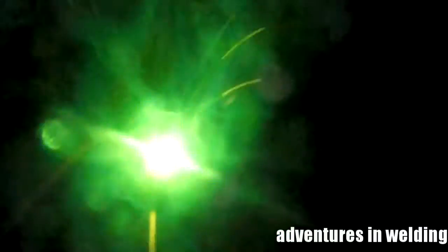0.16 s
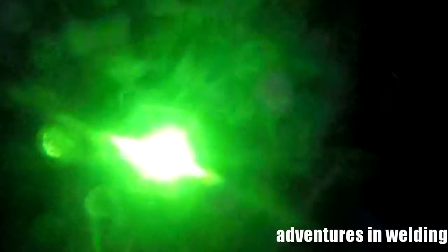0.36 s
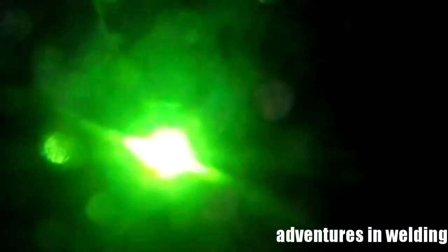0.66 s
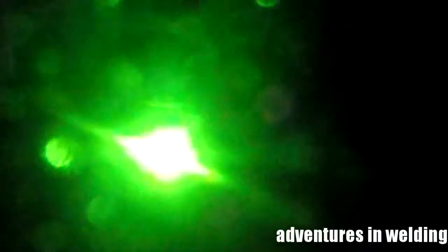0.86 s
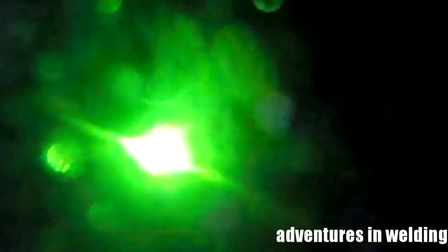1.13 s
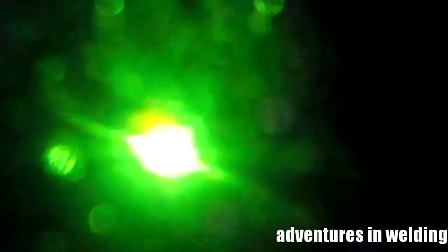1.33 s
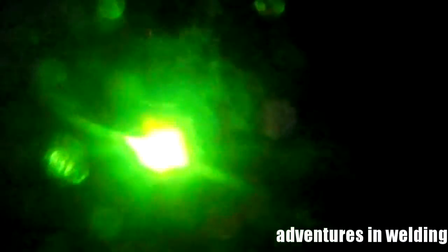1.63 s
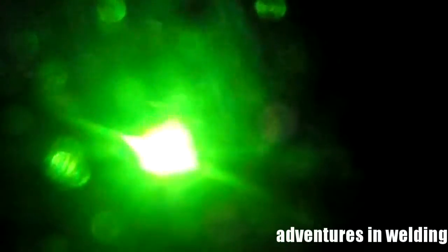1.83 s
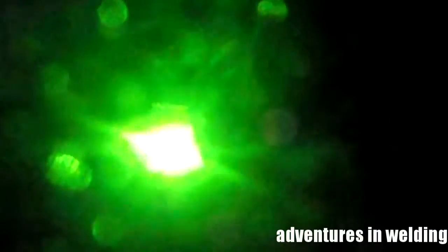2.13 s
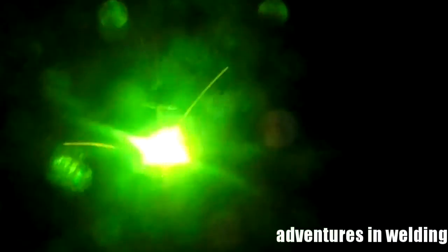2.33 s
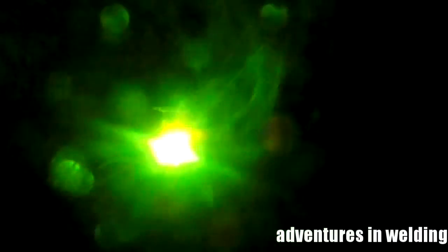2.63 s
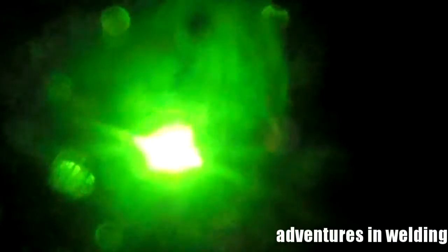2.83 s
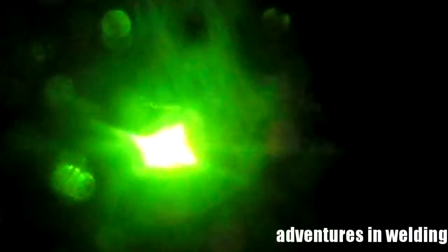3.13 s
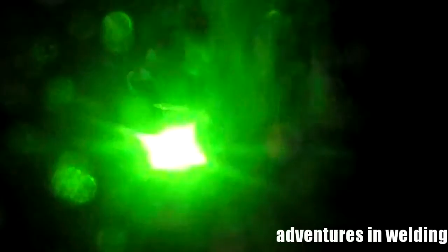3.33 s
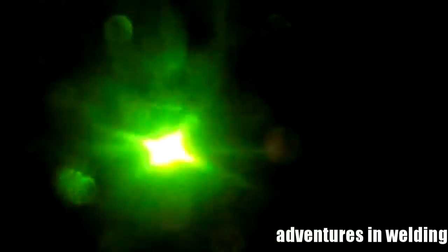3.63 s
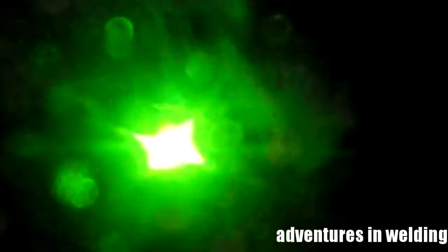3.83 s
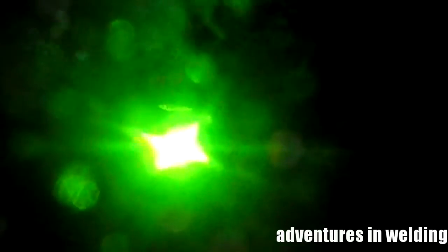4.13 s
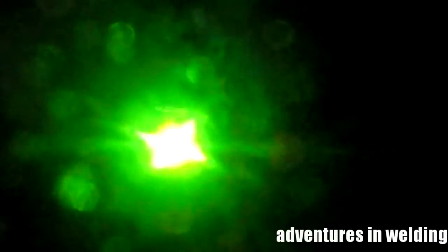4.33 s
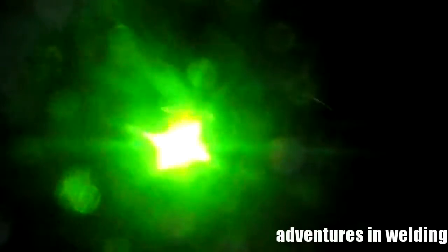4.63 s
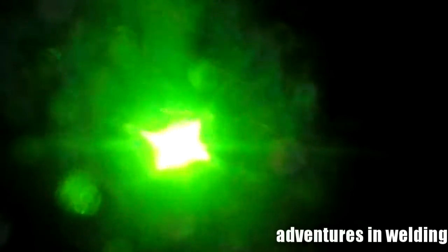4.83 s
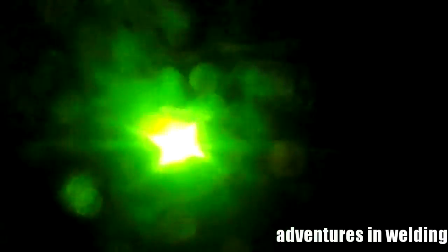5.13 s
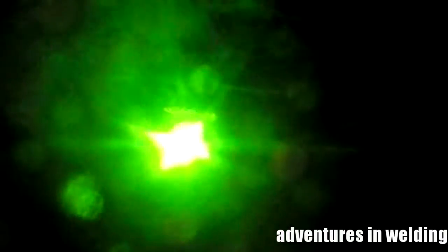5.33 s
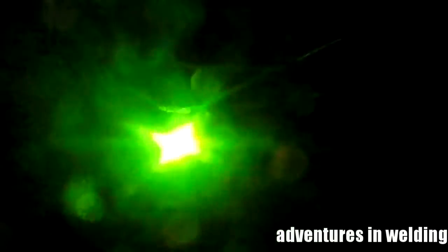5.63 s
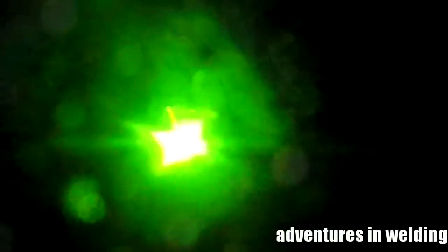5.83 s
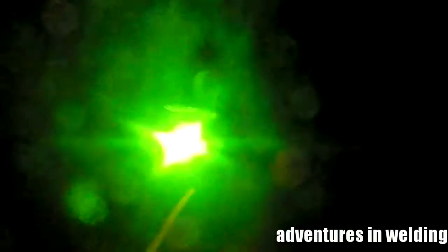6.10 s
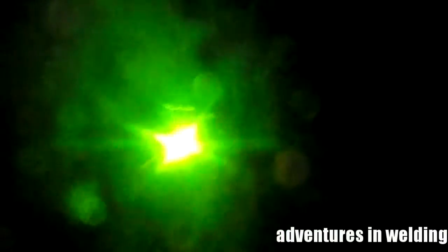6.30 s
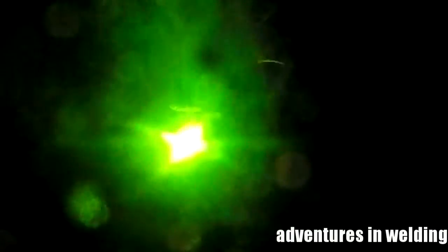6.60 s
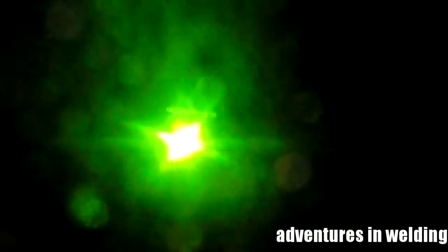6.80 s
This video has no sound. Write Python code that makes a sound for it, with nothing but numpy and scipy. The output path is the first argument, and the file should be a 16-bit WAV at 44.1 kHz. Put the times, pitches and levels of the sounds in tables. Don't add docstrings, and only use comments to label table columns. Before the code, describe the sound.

Rapid hard electrical cracks and tiny pops with sputtering hiss as a torch welds thick steel plate, the shop answering each snap briefly.

```python
import sys
import numpy as np
from scipy import signal
from scipy.fft import rfft, irfft, next_fast_len
from scipy.io import wavfile
from scipy.ndimage import uniform_filter1d

SR = 44100
rng = np.random.default_rng(int(sys.argv[2]) if len(sys.argv) > 2 else 0)


def convert_level_to_amplitude(level_db):
    exponent = np.asarray(level_db, float) / 20
    return 10 ** exponent


def digitize_waveform(pressure):
    field = np.atleast_2d(pressure).T
    bounded = np.clip(field, -1, 1)
    quanta = np.round(bounded * 32767).astype(np.int16)
    wavfile.write(sys.argv[1], SR, quanta)


N = 306936

SNAP_DB_PER_SHARE = 5.5


def evened(x):
    return x / np.sqrt(np.mean(x ** 2) + 1e-20)


def read(points, hz):
    f, value = np.transpose(points)
    return np.interp(np.log(hz + 1), np.log(f + 1), value)


def coloured(x, points):
    size = next_fast_len(len(x) + 4096)
    gain = convert_level_to_amplitude(read(points, np.fft.rfftfreq(size, 1 / SR)))
    return irfft(rfft(x, size) * gain, size)[:len(x)]


def impulses(s, size):
    at = s.ravel()[:, None] * SR
    near = np.floor(at) + np.arange(-7, 9)
    kernel = np.sinc(near - at) * np.cos(np.pi * (near - at) / 16) ** 2
    heights = size.ravel()[:, None] * kernel
    return np.bincount(near.astype(int).ravel(), heights.ravel(), N + SR)[:N]


def patchy(x):
    patch_db = 2
    z = signal.stft(x, nperseg=512)[2]
    field = uniform_filter1d(rng.standard_normal(z.shape), size=6, axis=0)
    field = evened(uniform_filter1d(field, size=8, axis=1))
    return evened(signal.istft(z * convert_level_to_amplitude(patch_db * field), nperseg=512)[1][:N])


def hum():
    # pitch_hz, level_db (per Hz)
    wash_spectrum = [(30, -19), (70, -10), (150, -14), (255, 1), (330, -5), (420, -10), (650, -7),
                     (900, -14), (1900, -11), (2600, -20), (4500, -16), (7000, -24), (10000, -34),
                     (15000, -43), (15400, -75)]
    # time_s, lift_db
    wash_lift = [
        (0, 2),
        (1, 0),
        (3.1, 0),
        (4.45, -1.5),
        (5.05, 0.5),
        (5.7, 3),
        (6.96, 1.5),
    ]
    wash_db, whine_hz, whine_db = -49.5, 520, -56.5
    t = np.arange(N) / SR
    slow = uniform_filter1d(rng.standard_normal((2, N)), 2500)
    waver, wobble = evened(uniform_filter1d(slow, 2500))
    wash = convert_level_to_amplitude(wash_db + 1.95 * waver) * patchy(coloured(rng.standard_normal(N), wash_spectrum))
    turn = 2 * np.pi * np.cumsum(whine_hz + 1.75 * waver) / SR
    whine = convert_level_to_amplitude(whine_db + 1.5 * wobble) * (np.sin(turn) + .3 * np.sin(2 * turn))
    return convert_level_to_amplitude(np.interp(t, *np.transpose(wash_lift))) * (wash + whine)


def arc_cycle():
    # strike_s, crack_db, rebound_share (above 0 the gas snaps back)
    full_strikes = [(0.0452, -6.4, 0.42), (0.0456, -9.8, 0.06), (0.0459, -3.5, -0.33),
                    (0.0614, -8.2, -0.12), (0.0695, -13.0, -0.29), (0.0768, -3.3, -0.0),
                    (0.0912, -8.2, 0.09), (0.0986, -6.6, -0.11), (0.1095, -11.8, -0.28),
                    (0.1143, -5.1, -0.16), (0.1207, -11.2, -0.11), (0.1313, -2.9, -0.17),
                    (0.2087, -0.4, -0.15), (0.2908, -2.4, -0.14), (0.3468, -0.2, 0.12),
                    (0.4905, -0.5, -0.11), (0.538, -0.6, 0.27), (0.5992, -3.1, -0.21),
                    (0.6545, -1.0, -0.18), (0.7212, -1.7, -0.16), (0.8294, -0.7, -0.09),
                    (0.906, -1.3, -0.1), (1.1393, -0.8, 0.1), (1.1683, -8.9, -0.02), (1.179, -2.3, 0.19),
                    (1.2247, -6.9, 0.09), (1.23, -2.0, 0.16), (1.2318, -9.6, -0.36), (1.2836, -0.9, -0.01),
                    (1.3552, -0.9, -0.14), (1.4057, -1.7, -0.04), (1.4181, -4.6, -0.13),
                    (1.4617, -4.6, 0.14), (1.4708, -6.6, -0.1), (1.5246, -1.4, -0.17),
                    (1.5789, -0.8, 0.18), (1.6334, -0.8, -0.12), (1.7454, -1.8, -0.21),
                    (1.8029, -1.2, -0.01), (1.8601, -0.5, 0.01), (1.9062, -0.7, -0.12),
                    (1.9556, -3.7, -0.38), (1.9946, -3.9, 0.18), (2.0511, -2.3, 0.16),
                    (2.1458, -4.4, -0.34), (2.1847, -1.8, 0.16), (2.2346, -1.1, 0.17), (2.3037, -0.9, 0.3),
                    (2.4964, -1.8, -0.13), (2.5346, -7.5, -0.02), (2.5413, -1.5, 0.2),
                    (2.5793, -8.7, -0.01), (2.5829, -8.1, 0.05), (2.6413, -1.9, -0.18),
                    (2.6752, -13.2, -0.27), (2.6758, -13.4, -0.48),
                    (2.6895, -2.2, -0.32), (2.7322, -4.1, 0.05), (2.7643, -2.8, 0.18), (2.8215, -0.7, 0.01),
                    (2.8802, -0.2, 0.23), (2.9417, -2.8, 0.27), (3.2054, -0.9, 0.07), (3.2489, -1.7, 0.04),
                    (3.2982, -0.5, 0.19), (3.3637, -0.2, 0.01), (3.4119, -1.4, -0.01),
                    (3.5834, -1.9, -0.24), (3.6355, -4.2, 0.19), (3.6399, -3.3, 0.16), (3.6446, -6.6, 0.17),
                    (3.8387, -2.1, -0.2), (3.879, -1.8, 0.15), (3.9763, -2.4, -0.25), (4.0175, -0.8, 0.03),
                    (4.0714, -0.8, 0.21), (4.116, -0.5, 0.27), (4.1569, -5.8, 0.12), (4.2451, -0.9, -0.05),
                    (4.2953, -0.6, -0.09), (4.3472, -0.8, 0.01), (4.5353, -1.4, -0.18),
                    (4.5926, -0.9, 0.25), (4.6485, -0.9, -0.16), (4.7801, -0.6, -0.02),
                    (4.8285, -1.0, -0.05), (4.9363, -1.5, -0.01), (5.1309, -1.3, -0.12),
                    (5.1641, -2.3, 0.15), (5.224, -0.9, 0.02), (5.301, -0.7, -0.13), (5.7728, 0.7, 0.13),
                    (5.8221, -5.8, 0.05), (6.0129, -5.8, 0.1), (6.0142, -2.9, -0.15), (6.0668, -8.1, -0.12),
                    (6.0682, -9.4, -0.3), (6.1289, 0.3, 0.33), (6.193, -7.6, -0.03), (6.2703, -0.7, -0.13),
                    (6.3144, -6.8, -0.34), (6.4328, -9.3, -0.19), (6.4604, -6.8, -0.03),
                    (6.5174, -5.8, 0.04), (6.5213, -4.2, 0.05), (6.5356, -9.5, 0.07), (6.6104, -1.8, -0.04),
                    (6.7141, -1.0, 0.08), (6.7446, -10.9, 0.12), (6.7473, -3.8, 0.09), (6.8073, -0.7, 0.05),
                    (6.8721, -8.5, -0.31)]
    # strike_s, crack_db
    brief_touches = [(0.0688, -13), (0.1076, -11), (0.4062, -12), (0.4075, -14), (0.4163, -14),
                     (0.4166, -15), (0.4345, -17), (0.5755, -11), (0.5953, -20), (0.6484, -15),
                     (0.8019, -14), (0.8023, -15), (0.901, -12), (1.2251, -18), (1.2263, -15),
                     (1.4511, -12), (1.5055, -22), (1.8549, -16), (1.8634, -16), (1.9425, -16),
                     (2.0481, -10), (2.2295, -12), (2.2991, -11), (2.5311, -10), (2.6348, -15),
                     (2.6395, -14), (2.6633, -13), (2.6683, -14), (2.7182, -18), (2.7185, -19),
                     (2.7192, -20), (2.7301, -21), (2.9207, -18),
                     (2.9329, -12), (2.9367, -11), (3.2413, -13), (3.4547, -11), (3.4595, -15), (3.46, -14),
                    (3.6195, -12), (3.6209, -12), (3.6211, -16), (3.6321, -16), (3.661, -15), (3.8422, -16),
                    (3.8714, -16), (3.9196, -15), (3.9249, -15), (3.9285, -13), (3.9752, -12),
                    (4.1537, -10), (4.4204, -32), (4.5282, -17), (4.6403, -12), (4.6425, -14),
                    (4.7142, -15), (4.7211, -14), (4.7231, -13), (4.7296, -16), (5.203, -11), (5.2172, -17),
                    (5.3746, -23), (5.377, -17), (5.4633, -29), (5.4958, -30), (5.5387, -31), (5.5932, -18),
                    (5.818, -16), (6.1011, -31), (6.3136, -13), (6.3625, -18), (6.3682, -12), (6.4196, -19),
                    (6.4483, -15), (6.6069, -15), (6.6635, -13), (6.6648, -16), (6.665, -13), (6.7104, -18)]
    # touch_s, pop_db
    short_pops = [(0.0426, -12), (0.0454, -8), (0.0611, -9), (0.0681, -11), (0.0694, -10), (0.0753, -8),
                  (0.0899, -10), (0.0964, -7), (0.1066, -8), (0.114, -11), (0.1149, -13), (0.1205, -13),
                  (0.1304, -9), (0.1319, -12), (0.2063, -13), (0.2871, -14), (0.3443, -13), (0.4049, -14),
                  (0.4071, -13), (0.4152, -14), (0.4161, -15), (0.46, -30), (0.4877, -15), (0.5345, -15),
                  (0.5732, -14), (0.5763, -10), (0.5979, -16), (0.6476, -14), (0.6514, -15), (0.7179, -13),
                  (0.8015, -18), (0.8017, -19), (0.8024, -8), (0.8279, -14), (0.8993, -13), (0.902, -12),
                  (0.9443, -15), (1.136, -14), (1.1675, -12), (1.1755, -11), (1.2202, -22), (1.2217, -14),
                  (1.2288, -13), (1.2819, -15), (1.3521, -13), (1.4026, -15), (1.4175, -12), (1.4493, -16),
                  (1.4524, -19), (1.4599, -12),
                  (1.4705, -13), (1.5042, -14), (1.5221, -14), (1.5757, -14), (1.6309, -13), (1.7425, -13),
                (1.8003, -13), (1.8543, -12), (1.8579, -13), (1.9035, -13), (1.942, -14), (1.9534, -13),
                (1.9911, -14), (2.0457, -13), (2.0491, -9), (2.1431, -13), (2.1817, -12), (2.2285, -12),
                (2.231, -13), (2.2975, -13), (2.302, -11), (2.3055, -5), (2.3107, -16), (2.4928, -13),
                (2.5299, -13), (2.5323, -10), (2.5408, -11), (2.5774, -12), (2.5807, -10), (2.6285, -29),
                (2.6347, -13), (2.6386, -14), (2.6407, -8), (2.6678, -12), (2.6751, -10), (2.6889, -9),
                (2.718, -17), (2.7197, -21), (2.7309, -13), (2.761, -12), (2.8183, -14), (2.8772, -15),
                (2.9206, -16), (2.9284, -15), (2.9311, -16), (2.9347, -14), (2.9411, -15), (3.1905, -13),
                (3.2025, -12),
                  (3.2395, -14), (3.2418, -21), (3.2465, -12), (3.2943, -12), (3.3614, -13), (3.4087, -13),
                (3.4534, -14), (3.4553, -11), (3.5808, -14), (3.6182, -13), (3.6201, -10), (3.6331, -16),
                (3.6394, -14), (3.6482, -16), (3.8345, -11), (3.8664, -18), (3.8758, -11), (3.919, -12),
                (3.924, -10), (3.9275, -9), (3.9732, -13), (3.9756, -10), (4.014, -13), (4.0657, -23),
                (4.0686, -14), (4.1127, -13), (4.1516, -14), (4.1543, -9), (4.2425, -15), (4.2925, -13),
                (4.3443, -15), (4.5274, -13), (4.5317, -12), (4.5897, -14), (4.6393, -13), (4.6419, -13),
                (4.6464, -12), (4.7134, -13), (4.7149, -12), (4.7153, -16), (4.7205, -13), (4.7773, -12),
                (4.8258, -13), (4.8724, -13), (4.873, -12), (4.8742, -15), (4.8878, -21), (4.888, -13),
                (4.891, -15), (4.9347, -13),
                  (5.1288, -13), (5.1613, -12), (5.2018, -12), (5.2204, -17), (5.299, -14), (5.371, -12),
                (5.3766, -13), (5.4341, -12), (5.5853, -10), (5.6204, -10), (5.77, -9), (5.8176, -12),
                (5.82, -11), (5.889, -29), (6.0113, -12), (6.0133, -8), (6.0146, -14), (6.0657, -10),
                (6.0676, -7), (6.1253, -13), (6.1857, -14), (6.1928, -14), (6.2683, -14), (6.3122, -15),
                (6.3143, -11), (6.3635, -21), (6.3668, -15), (6.4325, -13), (6.4528, -11), (6.4533, -9),
                (6.502, -13), (6.5168, -11), (6.521, -11), (6.5354, -11), (6.6065, -11), (6.6089, -9),
                (6.6626, -11), (6.6644, -9), (6.7123, -12), (6.7434, -11), (6.744, -10), (6.8049, -13),
                (6.8719, -14)]
    pop_trim_db = -2.1
    weak = brief_touches
    rebound = 0.0028 + 0.15 * rng.standard_normal(len(weak))
    strikes = [tuple(row) for row in full_strikes]
    strikes = strikes + [(s, db, share) for (s, db), share in zip(weak, rebound)]
    shorts = [(s, db + pop_trim_db) for s, db in short_pops]
    return strikes, shorts


def sizzle(strikes, shorts):
    # touch_s, rise_db_per_ms, final_db
    swells = [(.0426, 1, -37), (.8015, .8, -40), (1.136, 1.8, -39), (1.7425, .35, -34), (2.1431, .7, -34),
              (2.4928, 1.5, -33), (3.5808, 1, -36), (3.8345, .6, -33), (4.2425, 1.5, -37),
              (4.5274, 1.5, -37), (4.7773, .9, -37), (5.1288, 1.2, -33), (5.463, .3, -46), (5.499, .3, -45),
              (5.54, .3, -47), (5.77, .9, -37), (5.889, .4, -45), (6.0113, .4, -39), (6.1253, .4, -44),
              (6.2683, 1.5, -41), (6.4196, .9, -36), (6.6065, .9, -41)]
    # pitch_hz, width_hz, level_db
    hiss_resonances = [(4900, 700, 0), (6600, 600, 1), (8100, 700, 0)]
    flare_db, flare_t60_s = -34, 0.25
    approach_db, approach_t60_s = -54, 0.13
    sputter_db = 4.5
    t = np.arange(N) / SR
    s, db, rebound = np.transpose(strikes)
    kick_db = db + flare_db + SNAP_DB_PER_SHARE * rebound + 2 * rng.standard_normal(len(s))
    kicks = np.bincount((s * SR).astype(int), convert_level_to_amplitude(kick_db) ** 2, N)
    flare = signal.lfilter([1], [1, -convert_level_to_amplitude(-2 * 60 / (flare_t60_s * SR))], kicks)

    touches = np.bincount((np.transpose(shorts)[0] * SR).astype(int), minlength=N) * convert_level_to_amplitude(2 * approach_db)
    approach = signal.lfilter([1], [1, -convert_level_to_amplitude(-2 * 60 / (approach_t60_s * SR))], touches[::-1])[::-1]
    swell = sum(convert_level_to_amplitude(2 * (end_db - 1000 * rise * abs(t - touch))) * (t < touch + .003)
                for touch, rise, end_db in swells)
    power = abs(uniform_filter1d(flare + approach, 200)) + swell
    sputter = np.tanh(evened(uniform_filter1d(rng.standard_normal(N), size=120)))
    power = power * convert_level_to_amplitude(2 * sputter_db * sputter - sputter_db)

    band = signal.butter(2, (2600, 8300), "bandpass", fs=SR, output="sos")
    hiss = signal.sosfilt(band, coloured(rng.standard_normal(N), [(15000, 0), (15400, -40)]))
    hiss = hiss + sum(convert_level_to_amplitude(peak_db) * signal.lfilter(*signal.iirpeak(hz, hz / width, SR), hiss)
                      for hz, width, peak_db in hiss_resonances)
    return np.sqrt(power) * evened(hiss)


def pressure_steps(strikes, shorts, echoes):
    # tick_s, level_db
    ticks = [(1.5074, -22), (1.7411, -28), (2.4897, -27), (4.3838, -32), (4.5295, -16), (4.9139, -25),
             (5.0879, -33), (5.417, -31), (5.503, -37), (5.95, -40), (6.6725, -19)]
    short_rebound, rebound_ms = .24, .075
    echo_db = -0.66
    root_wander, root_wander_ms = .27, .012
    pushes = [(s, db, short_rebound) for s, db in shorts + ticks]
    s, db, rebound = np.transpose(strikes + pushes)[..., None]
    size = convert_level_to_amplitude(db) * np.where(np.arange(len(s)) < len(strikes), -1, 1)[:, None]

    ms, gain, drift = np.transpose(echoes)
    late_wander, size_wander = rng.standard_normal((2, len(s), len(ms))) * (ms > .1)
    s = s + (ms + drift * s + root_wander_ms * late_wander) / 1000
    size = size * gain * (1 + root_wander * size_wander) * convert_level_to_amplitude(echo_db * (ms > 0))

    fade = np.exp(-1000 / (rebound_ms * SR))
    back = signal.lfilter([0, 0, 0, .62], [1, -fade], impulses(s, size * rebound))
    sharp = np.clip(.22 * rng.standard_normal((len(s), 1)), -.3, .5)
    edge = np.convolve(impulses(s, size * sharp), [-1, 2, -1], "same")
    return impulses(s, size * (1 - .5 * sharp)) + edge - back


def cracks(arc):
    # delay_ms, signed_gain, drift_ms_per_s
    close_echoes = [(-.06, .13, 0), (.075, -.11, 0), (.22, -.08, 0), (.35, -.43, 0), (.58, .07, 0),
                    (.71, -.27, 0), (.84, -.2, .004), (.95, -.26, -.003), (1.11, -.2, 0),
                    (1.25, -.16, -.005), (1.33, .15, -.007), (1.41, -.12, -.008), (1.61, .28, -.008),
                    (1.75, -.23, -.011), (1.84, .17, -.009), (2.06, .2, -.007), (2.35, -.17, -.008),
                    (3.27, .12, .002), (3.37, -.05, 0)]
    # delay_ms, signed_gain, drift_ms_per_s
    far_returns = [(3.5, .06, 0), (4.95, .06, 0), (5.72, .11, -.004), (6.5, .08, .004), (8.3, .09, 0),
                   (8.7, .1, -.004), (10.4, -.09, -.004), (12.7, -.07, 0), (13.9, .08, 0), (14.6, .08, 0)]
    # pitch_hz, level_db
    return_cut = [(300, -18), (900, -4.5), (1800, -5.5)]
    # pitch_hz, level_db
    crack_spectrum = [(30, -9), (150, -.5), (700, -.7), (1300, -.3), (2000, -1.8), (4000, -5), (6000, -9),
                      (8000, -14.3), (11000, -26), (15000, -37), (16500, -52)]
    crack_db = .2
    direct = (0.0008, 0.98, 0.0013)
    steps = pressure_steps(*arc, [direct] + close_echoes)
    steps = steps + coloured(pressure_steps(*arc, far_returns), return_cut)
    one = signal.unit_impulse(512, "mid")
    return convert_level_to_amplitude(crack_db) * coloured(steps, crack_spectrum) / coloured(one, crack_spectrum).max()


def plate_ring(t):
    # pitch_hz, level_db, t60_s
    modes = [(183, -2.5, 0.13), (333, 0.0, 0.12), (377, -1.8, 0.12), (492, -2, 0.12), (585, 1.0, 0.12),
             (1381, -3.7, 0.12), (1604, -3.7, 0.12), (1863, -5, 0.12), (1911, -1.7, 0.12), (1957, -1, 0.12),
             (2059, -5.1, 0.12), (3206, -7, 0.12), (3596, -4.7, 0.12), (3669, -5.6, 0.12),
             (4452, -4.0, 0.12), (4643, -6.3, 0.12), (4931, -6.3, 0.12), (5025, -7, 0.12),
             (5141, -5.8, 0.12), (5351, -6.1, 0.12), (5526, -3, 0.12), (6029, -6.1, 0.12), (6468, -6, 0.12),
             (6541, -6, 0.12), (6637, -0.2, 0.12), (6773, -3.6, 0.12), (6918, -5.9, 0.12), (7720, -6, 0.12),
             (8420, -4, 0.12), (11800, -9, 0.12), (12150, -9, 0.12)]
    plate_db = -12.5
    damping_hz = 9700
    ring = sum(convert_level_to_amplitude(db - 60 * t / t60 * (0.5 + hz / damping_hz)) * np.cos(2 * np.pi * hz * t)
               for hz, db, t60 in modes)
    ring = ring * np.clip((t - .002) / 0.023, 0, 1)
    return convert_level_to_amplitude(plate_db) * ring / np.linalg.norm(ring)


def shop_tail(t):
    # pitch_hz, level_db
    tail_spectrum = [(50, -42), (150, -27), (280, -6), (550, -8.5), (1000, -16.5), (1800, -9), (3000, -1),
                     (5000, 3.5), (6700, 0.5), (9000, -1), (12000, -5), (15000, -14.5), (15400, -50)]
    # pitch_hz, t60_s
    tail_t60 = [(150, 0.11), (400, 0.39), (1000, 0.54), (2800, 0.084), (7000, 0.085), (13000, 0.074)]
    # delay_ms, spread_ms, lift_db
    walls = [
        (8.2, 1.2, 4.5),
        (14, 1.2, 3),
        (19.4, 1.2, 4),
        (29.3, 1.2, 3),
        (33.5, 1, 3),
    ]
    shop_db = -2.5
    hz, frames, z = signal.stft(rng.standard_normal(len(t)), SR, nperseg=128)
    decay = convert_level_to_amplitude(-60 * frames / read(tail_t60, hz)[:, None])
    tail = signal.istft(z * decay, SR, nperseg=128)[1][:len(t)]
    swell_db = sum(db * np.exp(-((1000 * t - ms) / spread) ** 2 / 2) for ms, spread, db in walls)
    tail = coloured(tail, tail_spectrum) * convert_level_to_amplitude(swell_db) * np.clip((t - .0012) / 0.007, .12, 1)
    return convert_level_to_amplitude(shop_db) * tail / np.linalg.norm(tail)


def shop_paths():
    # pitch_hz, delay_ms, spread_ms, level_db
    panels = [
        (6680, 7.934, .81, -14.5),
        (1950, 8.575, .55, -19),
        (420, 7.8, .9, -22),
        (500, 19.9, .8, -22),
    ]
    t = np.arange(SR // 2) / SR
    ring, common = plate_ring(t), shop_tail(t)
    for hz, ms, spread, db in panels:
        burst = np.exp(-((1000 * t - ms) / spread) ** 2 / 2)
        burst = burst * np.sin(2 * np.pi * hz * (t - ms / 1000))
        ring = ring + convert_level_to_amplitude(db) * burst / np.linalg.norm(burst)
    return [ring + 0.75 * common + 0.11 * shop_tail(t) for _ in range(2)]


def snap(strikes):
    # pitch_hz, level_db
    snap_spectrum = [(1500, -34), (3500, 0)]
    opening_db_per_s = 0.41
    s, db, rebound = np.transpose(strikes)
    extra = convert_level_to_amplitude(SNAP_DB_PER_SHARE * rebound + opening_db_per_s * (s - N / SR / 2)) - 1
    return coloured(impulses(s, -convert_level_to_amplitude(db) * extra), snap_spectrum)


def shop(arc, paths):
    steps = pressure_steps(*arc, [(0.0057, 0.9, 0.0005)]) + snap(arc[0])
    turn = np.pi / 2 * np.arange(N) / N
    start = signal.oaconvolve(steps * np.cos(turn) ** 2, paths[0])[:N]
    end = signal.oaconvolve(steps * np.sin(turn) ** 2, paths[1])[:N]
    return 1.547 * (start + end)


def scene():
    arc = arc_cycle()
    paths = shop_paths()
    return (hum() + sizzle(*arc) + cracks(arc) + shop(arc, paths))[None]


def roll_off(x):
    return signal.sosfilt(signal.butter(12, 16480, fs=SR, output="sos"), x)


def record(dry):
    faded = dry * np.clip(0.96 + np.arange(N) / SR / 0.01, 0, 1)
    edge = signal.firwin(63, 15900, window=("kaiser", 5), fs=SR)[None]
    return roll_off(signal.oaconvolve(faded, edge, "same"))


dry = scene()
out = record(dry)
digitize_waveform(out)
```